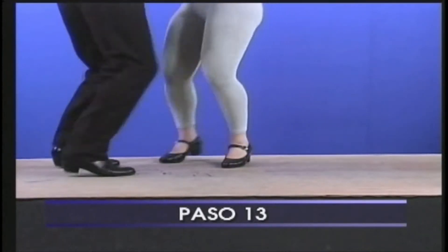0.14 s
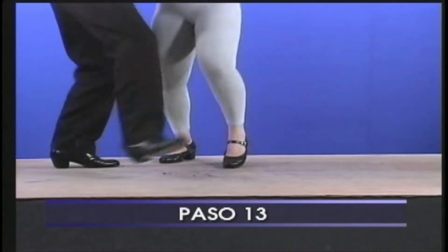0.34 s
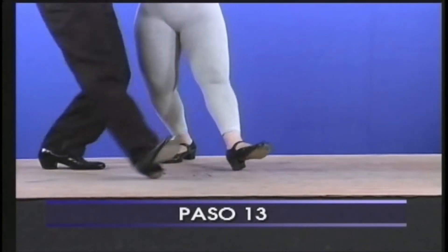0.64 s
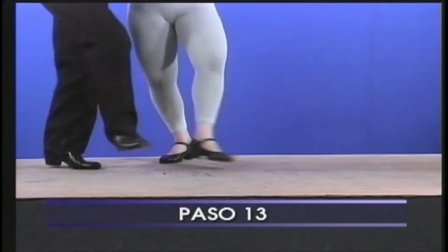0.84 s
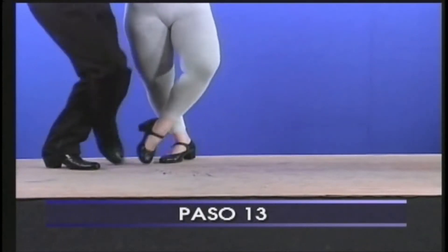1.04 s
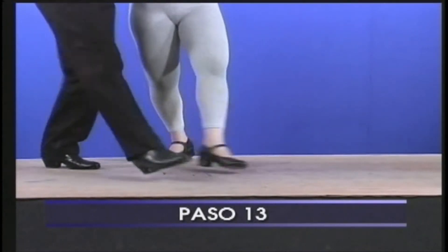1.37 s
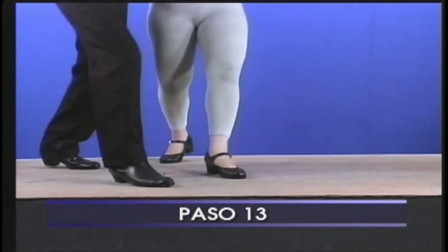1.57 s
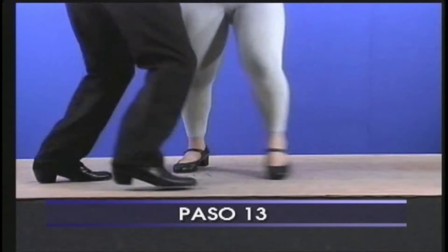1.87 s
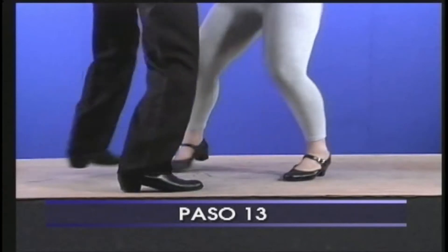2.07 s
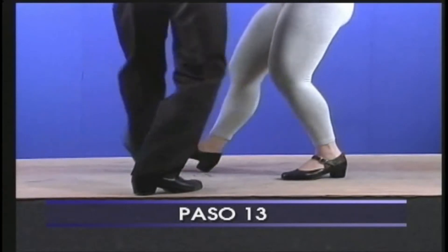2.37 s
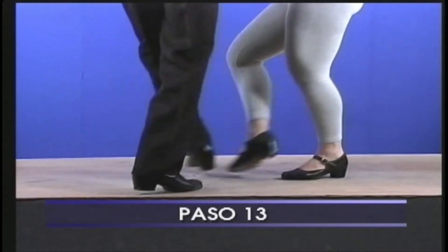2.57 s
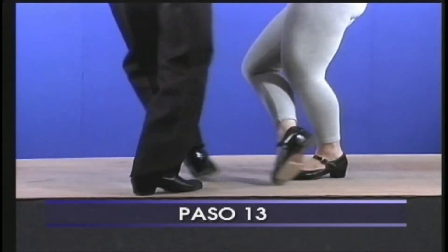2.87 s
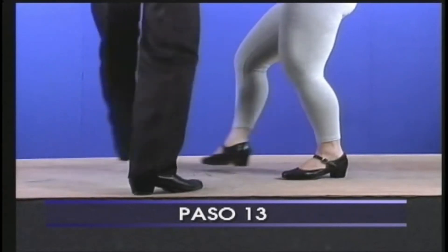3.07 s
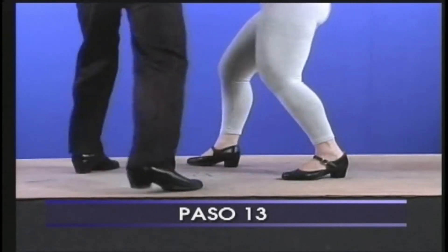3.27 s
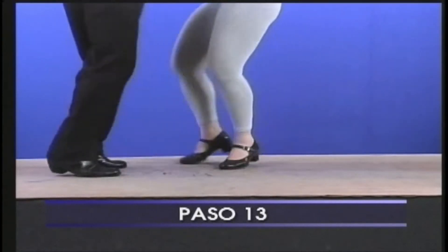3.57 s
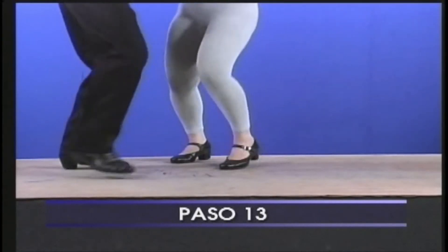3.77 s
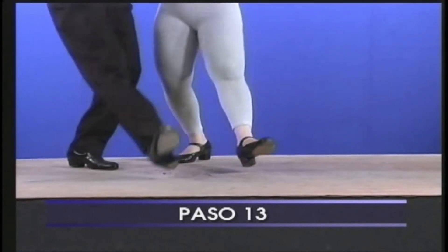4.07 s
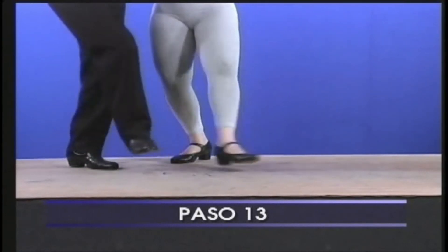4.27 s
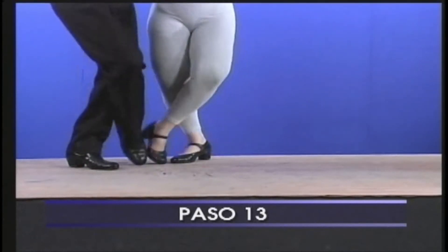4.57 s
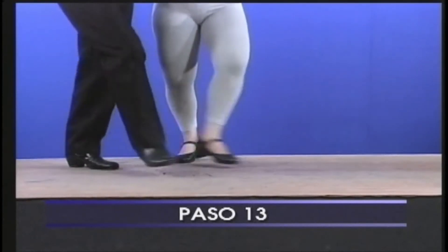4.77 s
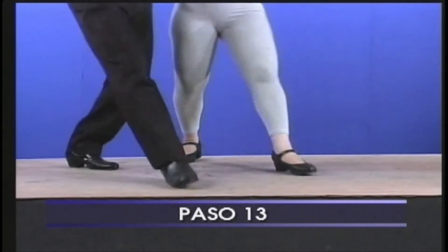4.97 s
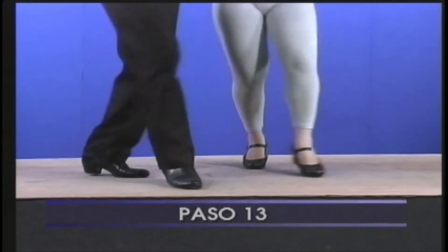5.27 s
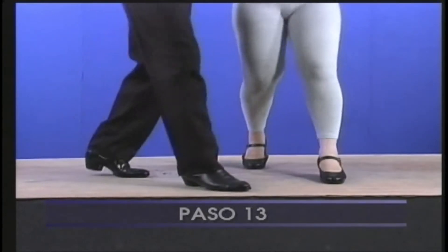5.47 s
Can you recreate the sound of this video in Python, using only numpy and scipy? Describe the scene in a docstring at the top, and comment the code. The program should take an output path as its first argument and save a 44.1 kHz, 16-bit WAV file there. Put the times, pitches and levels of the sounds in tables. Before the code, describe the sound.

Irregular footwork on resonant boards: woody heel clicks, low thuds as weight lands, flat-soled slaps and brief sandy drags of leather. Loud accents come in small clusters, separated by near-quiet gaps with only tiny grazes. The room is a moderately dry studio with a tail of about a third of a second, heard nearly mono by a single microphone over very low hiss and rumble.

```python
"""Dance steps on a wooden platform

A couple dances on a hollow platform in a studio, heard by one microphone.
Each heel or sole is a filtered pulse with clatter that rings decaying board modes; body weight booms the lowest.
Scuffs are gritty noise that swells and falls; shaped decaying noise gives the room's echoes.
Steady rumble, hiss and a thin high whistle lie underneath."""
import sys
import numpy as np
from scipy import signal
from scipy.fft import rfft, irfft
from scipy.io import wavfile

SR = 44100
rng = np.random.default_rng(int(sys.argv[2]) if len(sys.argv) > 2 else 0)


def store_pcm(level_fs):
    """Save levels as 16-bit WAV."""
    pcm = np.round(np.clip(level_fs, -1, 1) * 32767).astype(np.int16)
    wavfile.write(sys.argv[1], SR, np.atleast_2d(pcm).T)


N = 248238
SIZE = 32768  # samples given to one contact
AGE_S = np.arange(SIZE) / SR  # time since a contact
FREQ_HZ = np.arange(SIZE // 2 + 1) * SR / SIZE
SPOTS = 6  # places whose room echoes differ


def undb(db):
    """Decibels to gain."""
    return 10 ** (np.asarray(db) / 20)


def fade(t_s, t60_s):
    """Exponential decay by 60 dB in t60_s."""
    return np.exp(-np.log(1000) * t_s / t60_s)


def colour(points):
    """Causal (minimum-phase) frequency response through (Hz, dB) points, by folding the cepstrum."""
    hz, db = np.transpose(points)
    curve_db = np.interp(np.log(FREQ_HZ + 1), np.log(hz), db)
    cepstrum = irfft(np.log(undb(curve_db)))
    cepstrum[1:SIZE // 2] *= 2
    cepstrum[SIZE // 2 + 1:] = 0
    return np.exp(rfft(cepstrum))


def soft(hz):
    """Spectrum of a rounded push: the softer the contact, the lower the corner."""
    lag = 1 + 1j * (FREQ_HZ / hz)
    return 1 / (lag * lag)


def band(hz, width):
    """Response of one resonance; width is relative to its frequency."""
    s = 1j * FREQ_HZ / hz
    return s * width / (1 + s * width + s * s)


def burst(spectrum, db):
    """Scale a spectrum to the energy of 10 ms at this level."""
    energy = 2 * np.vdot(spectrum, spectrum).real / SIZE
    return spectrum * undb(db) / np.sqrt(energy / (SR / 100))


def add(track, s, sound):
    """Mix a sound into the track from time s on."""
    start = int(s * SR)
    lo, hi = max(start, 0), min(start + len(sound), N)
    track[lo:hi] += sound[lo - start:hi - start]


def steady(points, db):
    """Even noise of a given colour and RMS level."""
    white = rng.standard_normal(N + SIZE - 1)
    noise = signal.fftconvolve(white, irfft(colour(points)), "valid")
    return noise * undb(db) / noise.std()


def rumble(level_db=-79):
    """Faint room rumble: steady noise, strongest in the bass."""
    # Each row: frequency in Hz, relative spectral level in dB.
    rumble_colour = [(20, -36.5), (35, -11), (55, 3), (90, -6.5), (200, -15), (500, -21.5), (1200, -26.5),
                     (3000, -29.5), (6000, -31), (8000, -35), (15000, -36)]
    return steady(rumble_colour, level_db)


def hiss(level_db=-84):
    """Broad steady noise of one channel."""
    # Each row: frequency in Hz, relative spectral level in dB.
    hiss_colour = [(20, 7.5), (300, 1), (2000, -8), (6000, -2), (12000, -2), (15500, -8)]
    return steady(hiss_colour, level_db)


def whistle(hz=15734, rms_db=-102):
    """A monitor's thin line whistle: one steady sine."""
    return undb(rms_db) * np.sqrt(2) * np.sin(2 * np.pi * hz * np.arange(N) / SR)


def room_tails(hold_s=0.052, build_s=0.0044, uneven_db=2.5, clump_s=0.004):
    """Spectra of the room's echoes from a few spots: clumped, level at first, then dying, the treble soonest."""
    # Each row: frequency in Hz, decay time t60 in seconds.
    room_t60 = [(60, 0.41), (250, 0.37), (1000, 0.33), (3000, 0.3), (9000, 0.19)]
    hz, t60_s = np.transpose(room_t60)
    knots = rng.standard_normal((SPOTS, 512))
    clumps = np.array([np.interp(AGE_S / clump_s, np.arange(len(row)), row) for row in knots])
    noise = rfft(rng.standard_normal((SPOTS, SIZE)) * undb(uneven_db * clumps))
    late_s = np.hypot(AGE_S, hold_s) - hold_s
    # crossfading bands, one for each decay time
    shares = [np.interp(np.log(FREQ_HZ + 1), np.log(hz), row) for row in np.eye(len(hz))]
    tails = sum(irfft(noise * share) * fade(late_s, t) for share, t in zip(shares, t60_s))
    return rfft(tails * (1 - np.exp(-AGE_S / build_s)))


def scuffs(tails, grain_db=5, width=1.0, catch_db=3, catch_s=0.0044, bite_s=0.011, room_db=-5):
    """Leather drags over the grain: dense tiny slips that catch and let go, swell and fall, and their echoes."""
    # Each row: peak time in seconds, fall (Gaussian sigma) in seconds, level in dB, centre in Hz.
    scuff_rows = [(.02, 0.13, -65.5, 2100), (0.498, 0.018, -78.5, 4100), (1.738, 0.032, -62, 2290),
                  (1.789, 0.016, -68, 4200), (2.08, 0.0054, -74.5, 4740), (2.894, 0.014, -56, 2480),
                  (3.505, 0.082, -65, 2260), (3.72, .07, -72.5, 2980), (5.206, 0.052, -64, 2260),
                  (5.277, 0.012, -73.5, 6600), (5.462, 0.018, -63.5, 4300)]
    track, lead_s = np.zeros(N), 0.2
    for s, fall_s, db, hz in scuff_rows:
        catches = np.interp(AGE_S / catch_s, np.arange(512), rng.standard_normal(512))
        grains = np.minimum(rng.exponential(size=SIZE), 5)
        slips = rng.standard_normal(SIZE) * undb(grain_db * grains + catch_db * catches)
        rub = irfft(rfft(slips) * band(hz, width) * soft(0.63 * hz))
        sigma_s = np.where(AGE_S < lead_s, bite_s, fall_s)
        swell = np.exp(-((AGE_S - lead_s) / sigma_s) ** 2 / 2)
        rub = rub / rub.std() * swell * undb(db)
        echoes = irfft(rfft(rub) * tails[rng.integers(SPOTS)])
        echoes *= undb(room_db) * rub.std() / echoes.std()
        add(track, s - lead_s, rub + echoes)
    return track


def board_rings():
    """Spectrum of each mode of the platform: a decaying sine."""
    # Each row: frequency in Hz, relative level in dB, decay time t60 in seconds.
    boards = [(46, -9, 0.47), (51.3, -9.5, 0.64), (67.5, -4.5, 0.46), (84.65, 2, 0.34),
              (107.5, -12.5, 0.78), (131.6, 4, 0.28), (155.8, 4.5, 0.4), (189.1, 1.5, 0.48),
              (218, -5, 0.48), (261, -1.5, 0.5), (300.5, -0.5, 0.32), (332.2, 2.5, 0.24), (408, -1, 0.27),
              (453.3, 4.5, 0.32), (509, 6.5, 0.092), (580, -6, 0.25), (593, -5.5, 0.45), (645, 3.5, 0.21),
              (698, -12, 0.53), (737, 0.5, 0.23), (890, -19.5, 0.41), (904, 0, 0.13), (940, -13.5, 0.21),
              (1230, -11.5, .2), (1284, 1.5, 0.14), (1397, -20, .22), (1636, -7, .2)]
    return rfft([undb(db) * np.sin(2 * np.pi * hz * AGE_S) * fade(AGE_S, t60_s) for hz, db, t60_s in boards])


def board_modes(rings, spread_db=2):
    """Spectrum of the platform struck at one spot: each spot has its own mix of modes."""
    signs = rng.choice([-1, 1], len(rings))
    gains = undb(spread_db * rng.standard_normal(len(rings)))
    return (signs * gains) @ rings


def load(hz):
    """Body weight comes down slowly, so mainly the lowest modes boom."""
    return soft(hz) * soft(2 * hz)


def shifts(rings, roll_hz=60):
    """Weight rolls onto a foot without a knock and the platform booms softly."""
    # Each row: start in seconds, thud level in dB.
    shift_rows = [(.005, -49.5), (1.14, -42), (1.647, -46.5), (1.844, -49), (1.944, -45.5), (3.585, -43),
                  (3.636, -41), (3.75, -48.5), (5.193, -56), (5.288, -52.5)]
    track, roll = np.zeros(N), load(roll_hz)
    for s, thud_db in shift_rows:
        add(track, s, irfft(burst(roll * board_modes(rings), thud_db)))
    return track


def knocks(count, rattle=0.065, rattle_t60_s=0.06, echo=0.5, echo_s=0.0067, echo_hz=700):
    """Spectra of the dry contacts: a pulse, a brief clatter of shoe and plank, and a dull near reflection."""
    age_s = AGE_S[:SIZE // 8]
    envelope = fade(age_s, rattle_t60_s) * (1 - fade(age_s, rattle_t60_s / 10))
    clatter = rattle * rng.standard_normal((count, len(age_s))) * envelope
    reflection = echo * soft(echo_hz) * np.exp(-2j * np.pi * FREQ_HZ * echo_s)
    return rfft(clatter, SIZE) - 1 - reflection


def blows(rows, rings, walls, ring_db, room_db, heel_low_hz=140, weight_hz=75):
    """Blows knock, ring boards, fill the room and load the platform; ring and room dB are relative to the knock."""
    # Each row: frequency in Hz, relative level of the dry knock in dB.
    knock_colour = [(30, -32.5), (80, -2), (160, 6.5), (350, -1.5), (700, -2.5), (1400, -3.5), (2800, -3.5),
                    (4000, -12.5), (6500, -15.5), (9000, -25), (15000, -19)]
    track, weight = np.zeros(N), load(weight_hz)
    # a brief blow hardly moves the whole platform
    brief = (1j * FREQ_HZ / heel_low_hz) ** 2 * soft(heel_low_hz)
    contacts = colour(knock_colour) * knocks(count=len(rows))
    for (s, db, contact_hz, note_hz, thud_db), knock in zip(rows, contacts):
        # leather gives way, so a soft contact carries hardly any treble
        push = soft(contact_hz) / (1 + 1j * FREQ_HZ / (4 * contact_hz))
        boards = board_modes(rings)
        # shoe and plank favour one quickly damped note
        note = 1 + 1.8 * band(note_hz, 0.16)
        dry_knock = burst(push * note * knock, db)
        ring = burst(push * brief * boards, db + ring_db)
        echoes = burst(push * walls[rng.integers(SPOTS)], db + room_db)
        boom = burst(weight * boards, thud_db)
        add(track, s, irfft(dry_knock + ring + echoes + boom))
    return track


def alike(rows, note_hz, thud_db):
    """Blows of one kind share a note; their weight thud is thud_db relative to the knock."""
    return [(s, db, contact_hz, note_hz, db + thud_db) for s, db, contact_hz in rows]


def footwork(rings, tails):
    """Steps click and thud, stamps ring the boards, flat soles knock low, taps are faint knocks with a low thud."""
    # Room echo colour. Each row: frequency in Hz, relative level in dB.
    room_colour = [(30, -25.5), (80, 5.5), (160, -1), (300, 4), (520, 0), (900, 0), (1700, -1),
                   (2700, -8.5), (4000, -13), (7000, -18.5), (15000, -20)]
    # A heel lands and takes the weight. Each row: start in seconds, knock level in dB,
    # contact corner in Hz (high = hard), note of shoe and plank in Hz, weight thud level in dB.
    step_rows = [(.0953, -39, 1240, 1380, -38.5), (.216, -33.5, 2350, 1440, -34.5),
                 (.530, -46.5, 1470, 620, -40), (1.107, -49.5, 1800, 1270, -45.5),
                 (1.5684, -42, 1510, 460, -39), (1.8798, -43, 1700, 1220, -43.5),
                 (2.0002, -47, 1100, 1000, -60), (2.0499, -48, 1690, 2200, -50.5),
                 (2.4457, -31.5, 1650, 1210, -35.5), (3.303, -35.5, 2330, 960, -37.5),
                 (3.7067, -51, 3340, 2900, -43), (4.6015, -43, 2970, 310, -46)]
    # The other kinds. Each row: start in seconds, knock level in dB, contact corner in Hz.
    stamp_rows = [(.278, -45, 1030), (.6889, -32.5, 1410), (.7009, -35, 1820), (2.4094, -38, 1600),
                  (2.457, -29.5, 850), (4.1811, -40.5, 2120), (4.1873, -31.5, 1026), (4.9976, -44.5, 742),
                  (5.0232, -41, 645), (5.4197, -43, 1000), (5.437, -41, 850)]  # heel dug in, weight on the other leg
    sole_rows = [(1.1114, -48, 804), (1.598, -53, 590), (2.056, -42, 343), (2.8581, -33, 300),
                 (2.879, -41, 290), (3.710, -55, 800), (3.838, -52.5, 320), (4.001, -58, 435),
                 (5.4591, -45, 520)]  # flat of a sole comes down softly
    tap_rows = [(.9808, -61.5, 940), (1.509, -61.5, 452), (1.5427, -65, 3000), (1.773, -57.5, 3800),
                (1.944, -64.5, 3050), (2.3238, -60.5, 555), (2.8316, -53, 1200), (3.2625, -57.5, 1840),
                (3.289, -51.5, 1410), (3.818, -61, 1090), (4.5855, -53.5, 3220)]  # shoe grazes the floor on its way
    walls = colour(room_colour) * tails
    steps = blows(step_rows, rings, walls, ring_db=-5.5, room_db=-3)
    stamps = blows(alike(stamp_rows, note_hz=513, thud_db=-7.5), rings, walls, ring_db=-0.5, room_db=0.5)
    soles = blows(alike(sole_rows, note_hz=295.4, thud_db=-4), rings, walls, ring_db=-3.0, room_db=-5.5)
    taps = blows(alike(tap_rows, note_hz=800, thud_db=6), rings, walls, ring_db=-3.5, room_db=2)
    return steps + stamps + soles + taps


def scene(balance_db=-0.6):
    """Dance, rumble and whistle near the middle, first channel softer by 0.6 dB; separate hiss in each channel."""
    tails, rings = room_tails(), board_rings()
    dance = scuffs(tails) + shifts(rings) + footwork(rings, tails)
    middle = dance + rumble() + whistle()
    return np.array([middle * undb(side * balance_db / 2) + hiss() for side in (1, -1)])


def record(dry, low_hz=36, top_hz=15800):
    """The recorder cuts the deepest bass and the top."""
    dry = signal.sosfilt(signal.butter(6, low_hz, "high", fs=SR, output="sos"), dry)
    # 0.2 dB ripple, 70 dB stopband
    return signal.sosfilt(signal.ellip(10, 0.2, 70, top_hz, fs=SR, output="sos"), dry)


dry = scene()
out = record(dry)
store_pcm(out)
```